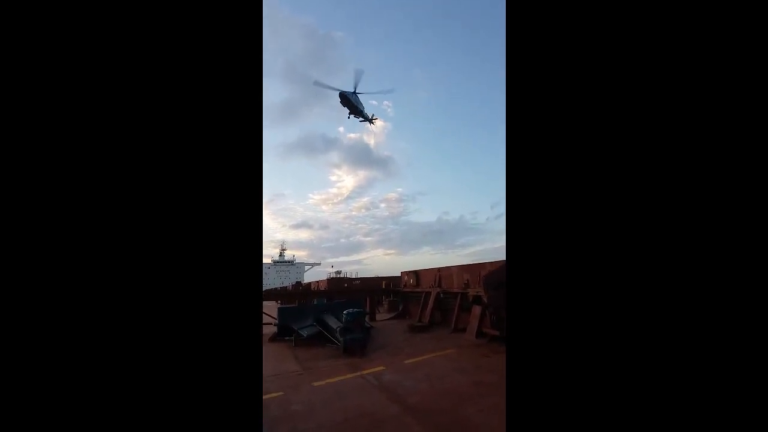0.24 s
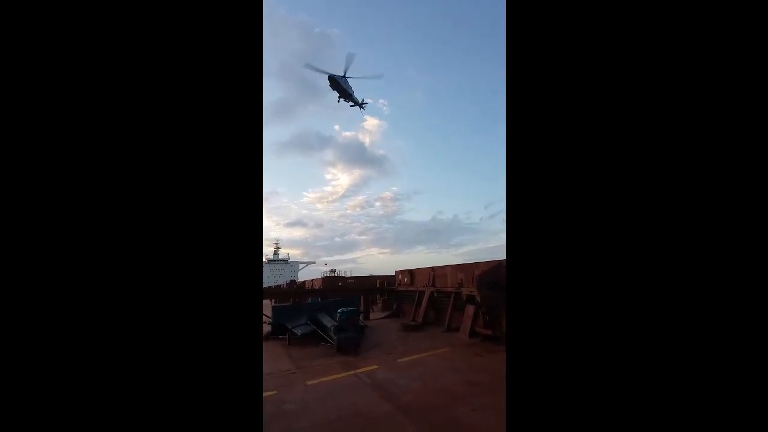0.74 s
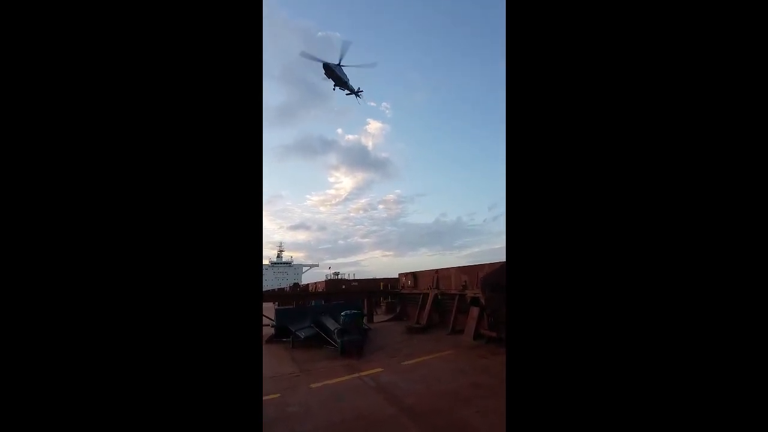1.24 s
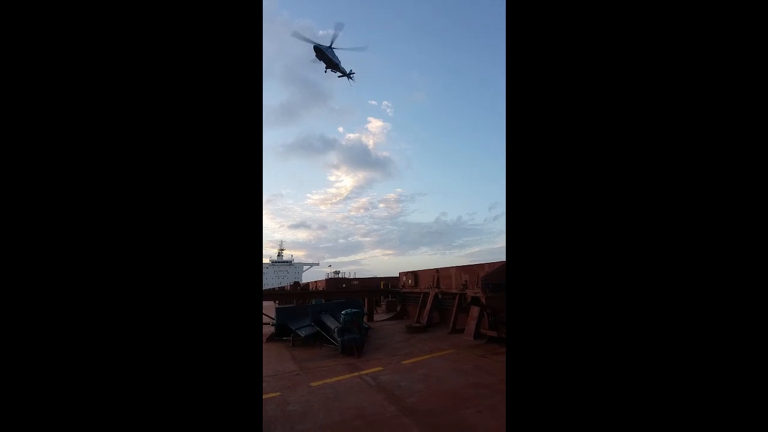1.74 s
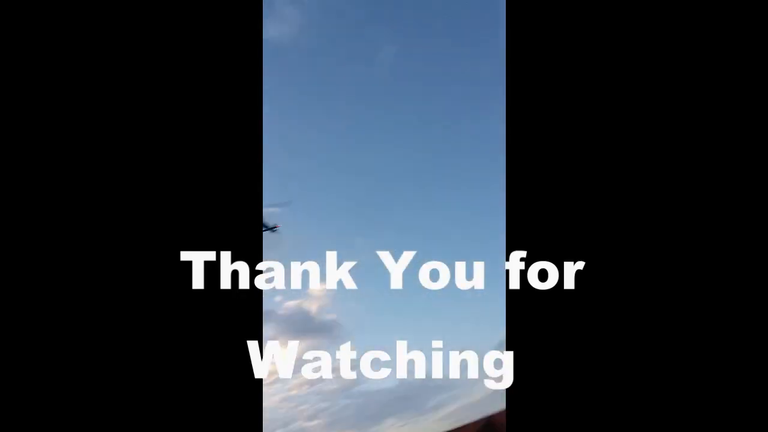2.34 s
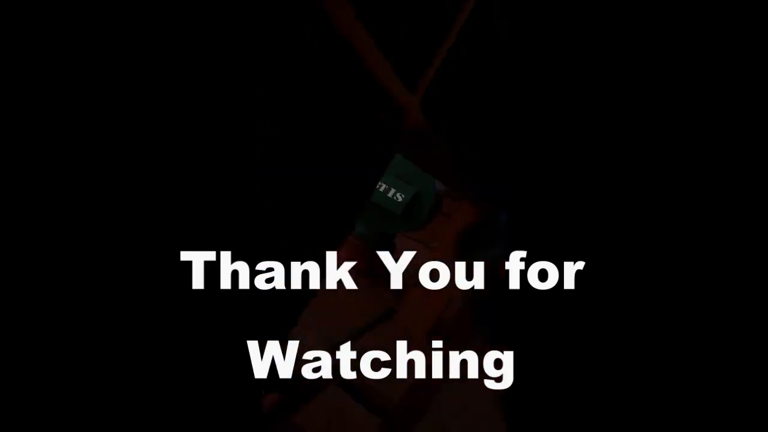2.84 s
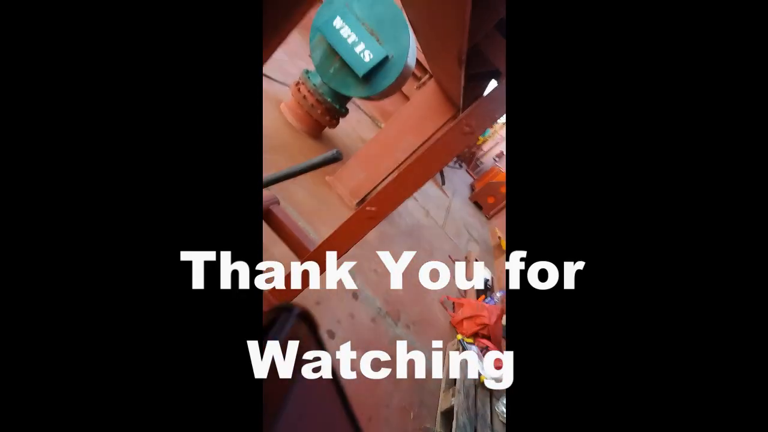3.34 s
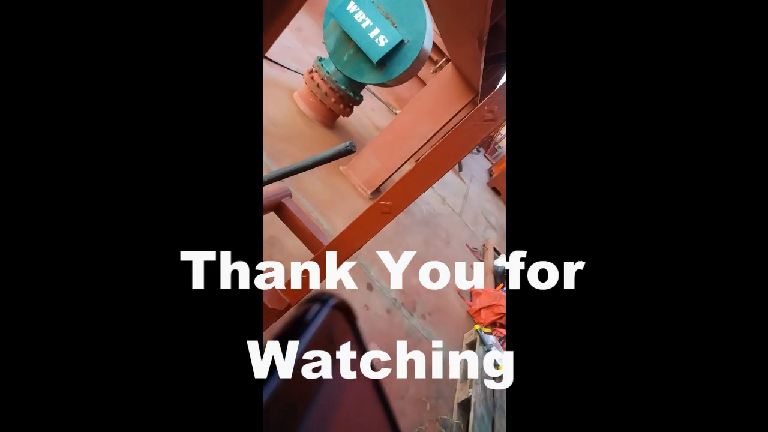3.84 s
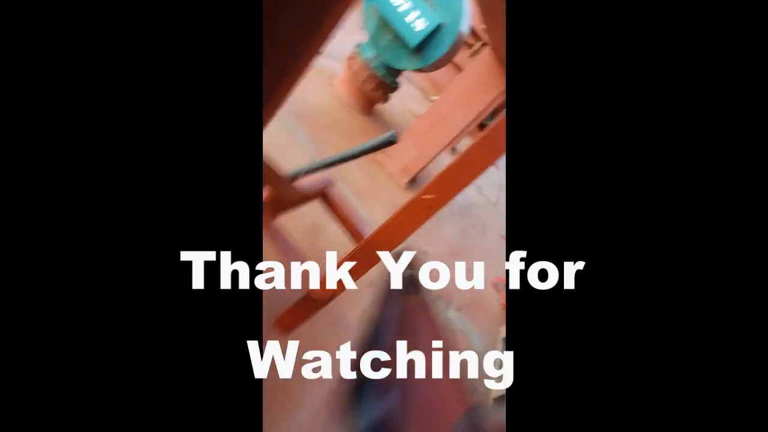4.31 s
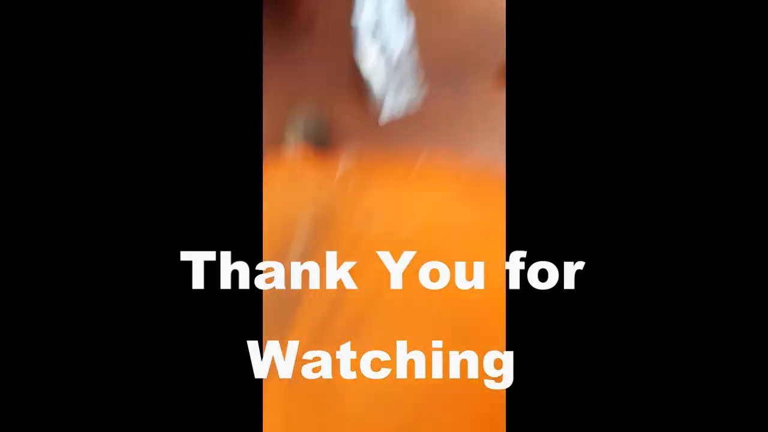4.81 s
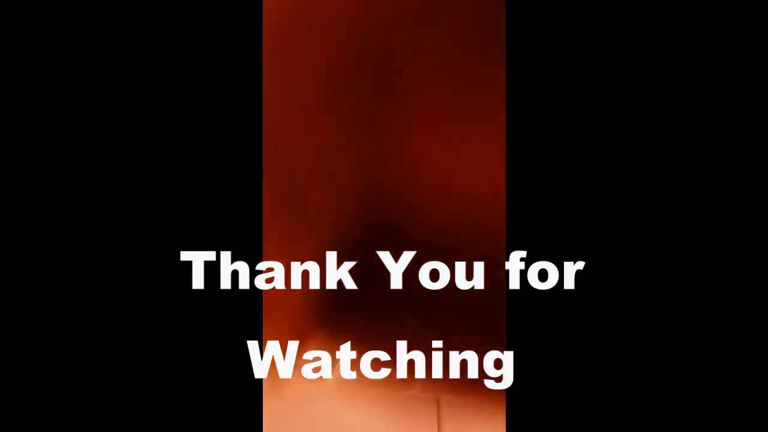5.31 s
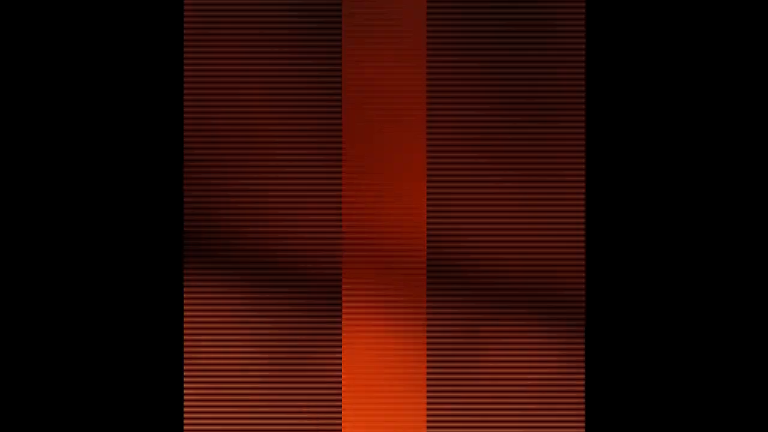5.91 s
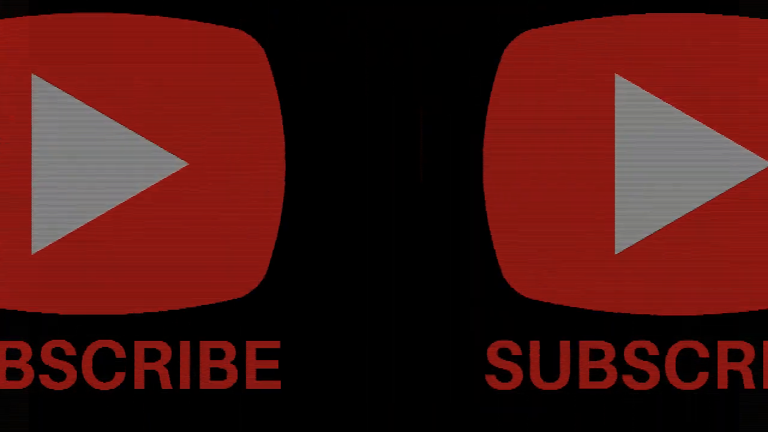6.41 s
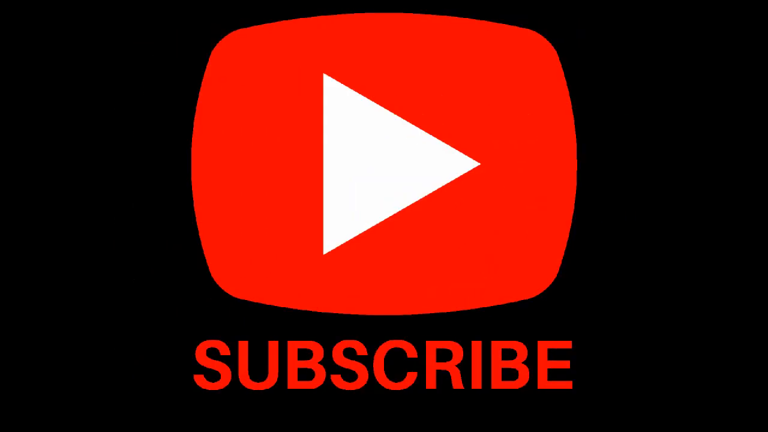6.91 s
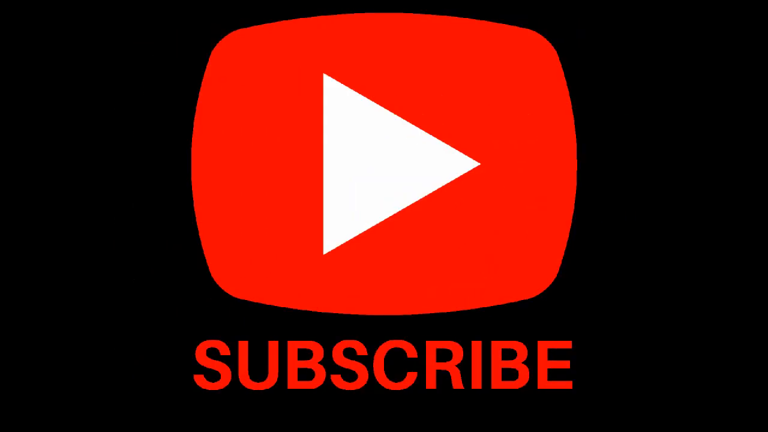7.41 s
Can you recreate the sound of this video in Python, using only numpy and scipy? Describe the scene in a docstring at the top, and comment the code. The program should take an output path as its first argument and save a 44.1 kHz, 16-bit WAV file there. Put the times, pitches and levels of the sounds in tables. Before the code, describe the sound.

Loud helicopter hovering close over a steel ship deck, buzzing tail-rotor hum, chopped roaring blades and thin turbine whine, turning duller among walls, then fading.

```python
"""On a steel ship deck, under a low hovering helicopter: its tail rotor hums, its blades roar, a turbine whines.
Blade beats are sine tones and filtered pulses; the roar is noise chopped by both rotors; the whine is fuzzy tones.
The microphone is carried from the open deck in among steel walls, where the hum swells and the roar turns dull.
Echoes, hard blade strikes, a low drone, wind and handling noise join in.
The sound is faded out, comes back at full level for a blink, and stops."""
import sys
import numpy as np
from scipy import signal
from scipy.fft import rfft, irfft, next_fast_len
from scipy.io import wavfile
from scipy.ndimage import uniform_filter1d, minimum_filter1d, map_coordinates

SR = 44100
rng = np.random.default_rng(int(sys.argv[2]) if len(sys.argv) > 2 else 0)


def materialize(psi):
    """Save the field psi as 16-bit PCM at rate SR to the path in sys.argv[1].

    A 1-D psi becomes a single channel; in a 2-D psi each row is a channel.
    """
    bounded = np.clip(np.atleast_2d(psi).T, -1, 1)
    quanta = np.round(bounded * 32767).astype(np.int16)
    wavfile.write(sys.argv[1], SR, quanta)


N = 337793  # length in samples

# speed of the tail rotor [t/s, blade passes per second]
TAIL_SPEED = [(0, 70.1), (1.2, 70.08), (1.6, 70.25), (2, 70.05), (4, 70.25), (5.5, 70.3), (6.9, 70.2)]
TAIL_START, MAIN_START = .47, .35  # rotor positions at the start, in blade passes
MAIN_PER_TAIL = .375  # main blade passes for each tail blade pass
# hum: standing waves give each low harmonic its own course, before a small shared lift
# [t/s, first level/dB, second level/dB, third level/dB]
HUM = [(0, -28.5, -29.5, -44.5), (0.5, -30, -34.5, -36.5), (0.9, -31.5, -39.5, -33),
       (1.5, -31.5, -36, -30.5), (2.1, -33.5, -30, -28.5), (2.55, -28, -21, -28),
       (2.7, -28.5, -23.5, -20.5), (2.95, -27, -38, -35), (3.4, -29.5, -33, -24), (4.05, -23, -30.5, -17),
       (4.3, -24, -29, -16), (4.62, -28, -25.5, -15), (4.84, -31.5, -25.5, -29.5), (5.02, -26.5, -24, -15),
       (5.3, -26.5, -22, -15.5), (5.5, -28, -22, -11), (5.66, -28, -30, -13.5), (5.85, -27, -27, -12),
       (6.25, -25, -27.5, -12.5), (6.6, -27.5, -35, -16.5), (6.86, -28.5, -26.5, -13)]
# the microphone's place [t/s, 0 on open deck to 1 among the walls]
SHELTER = [(0, 0.25), (2.3, 0.053), (2.5, 0.95), (3.4, 0.72), (4.4, 0.89), (4.9, 0.97), (5.3, 0.95),
           (6.9, 0.97)]

# colours of the noise layers on open deck and among the walls; only the shape counts [f/Hz, level/dB]
RUMBLE_OPEN = [(20, -28), (40, -29), (60, -21), (100, -24.5), (150, -1), (190, 4.5), (240, -3.5),
               (320, -1.5), (380, 4.5), (440, -0.5), (600, -50.5)]
RUMBLE_WALLS = [(20, -33), (35, -35.5), (50, -33.5), (100, -18.5), (150, -13), (190, -0.5), (240, 1.5),
                (300, -1.5), (380, -4.5), (440, -7.5), (600, -50.5)]
ROAR_OPEN = [(280, -39.5), (400, -26), (490, -5.5), (580, 0.5), (680, -1.5), (780, -4), (880, -4.5),
             (980, -2.5), (1100, -8.5), (1500, -44.5)]
ROAR_WALLS = [(280, -40), (400, -1.5), (460, 2.5), (530, 4), (650, 2.5), (770, 2.5), (880, 0), (980, -5),
              (1100, -3), (1500, -49.5)]
RASP_OPEN = [(800, -29.5), (1050, -3), (1250, 2), (1550, -2), (1850, -5.5), (2250, -12), (3000, -41.5)]
RASP_WALLS = [(800, -27.5), (1100, -1), (1280, 1), (1550, 0.5), (1850, -1), (2250, -9.5), (3000, -42)]
HISS_OPEN = [(1700, -24.5), (2300, -3), (2900, 1.5), (3600, -5), (4400, -4), (5600, -11.5), (6500, -6.5),
             (7200, -13.5), (8000, -21.5), (10000, -15.5), (12500, -18), (15500, -32)]
HISS_WALLS = [(1700, -18.5), (2300, 3), (2900, 0), (3500, -2.5), (4100, -3.5), (5600, -9), (6900, -10),
              (8100, -19.5), (10000, -17.5), (12500, -21.5), (14000, -26), (15500, -40.5)]
# colour of one tail blade's pulse in both places; only the shape counts [f/Hz, level/dB]
THUMP_OPEN = [(150, -42), (215, -25.5), (280, -13), (350, -30.5), (420, -5), (490, 2.5), (560, 1.5),
              (630, -8), (700, -6), (770, 4), (850, -4.5), (1000, -15.5), (1500, -30.5), (3000, -41)]
THUMP_WALLS = [(150, -37), (215, -20), (280, 1.5), (350, 8.5), (420, -2), (490, 2), (560, 2.5), (680, -7.5),
               (770, 4), (880, -12), (1250, -23.5), (1800, -27), (3000, -38)]
# colours of slaps, cracks and gusts; only the shape counts [f/Hz, level/dB]
SLAP = [(300, -24), (700, 1.5), (1050, 7), (2000, 8), (3000, 2.5), (4500, -6.5), (5500, -18.5), (8000, -40)]
CRACK = [(700, -12), (1500, 0), (3000, 0), (4500, -1), (5500, -12), (8000, -25)]
GUST = [(250, -20.5), (550, 1), (900, 1), (1700, -0.5), (2500, -13), (4500, -17), (8000, -37.5)]

# the load on the blades drives roar, rumble and thumps [t/s, level/dB]
ROAR_LEVEL = [(0, -18.5), (0.33, -15.5), (0.43, -20), (0.6, -18.5), (0.9, -15.5), (1.9, -18), (2.21, -16),
              (2.3, -14.5), (2.345, -12), (2.47, -16), (2.8, -18), (3, -15.5), (3.75, -16.5), (3.95, -15),
              (4.4, -14.5), (5.05, -14.5), (5.25, -16.5), (6.1, -17.5), (6.36, -19.5), (6.62, -16.5),
              (6.86, -17.5)]
# the rasp of the blade tips [t/s, level/dB]
RASP_LEVEL = [(0.0, -24), (0.12, -23), (0.54, -22.5), (0.72, -19), (0.81, -21), (0.99, -20.5), (1.14, -22),
              (1.89, -26), (2.19, -21), (2.4, -29.5), (2.49, -20.5), (3.3, -27), (3.6, -22.5),
              (3.81, -25.5), (4.05, -22.5), (4.35, -24.0), (4.5, -20.5), (4.77, -20.5), (5.07, -17.5),
              (5.28, -22.5), (5.97, -23.5), (6.09, -25.5), (6.35, -22.5), (6.44, -20.5), (6.63, -22.5),
              (6.86, -24.5)]
# the hiss rises and falls as the microphone turns [t/s, level/dB]
HISS_LEVEL = [(0, -26), (0.9, -26), (1.1, -29), (1.5, -29), (1.9, -31.5), (2.15, -29), (2.29, -29),
              (2.35, -35), (2.55, -31.5), (3.5, -37), (4.3, -35), (4.6, -32.5), (4.84, -27), (5.02, -25.5),
              (5.18, -29), (5.3, -30), (6.15, -33.5), (6.55, -33.5), (6.86, -29.5)]
# the turbine swells and sinks on its own [t/s, level/dB]
WHINE_LEVEL = [(0.0, -30.5), (0.15, -38), (0.36, -31.5), (0.66, -33.5), (0.93, -31.5), (1.41, -43.5),
               (2.16, -38.5), (2.22, -34.5), (2.31, -48.5), (2.46, -38), (2.67, -45.5), (2.76, -41),
               (3.45, -47), (4.65, -43), (4.83, -32), (4.92, -39), (5.1, -33.5), (5.31, -40), (5.7, -39.5),
               (5.76, -44.5), (5.88, -38.5), (6.63, -49.5), (6.86, -39.5)]
# offsets added to those levels (dB on open deck, dB among the walls)
RUMBLE_DB, ROAR_DB, THUMP_DB = (-13, -2.5), (-4, -1), (-3, -4.5)
RASP_DB, HISS_DB, WHINE_DB = (-1.5, 0), (-2.5, 0.5), (0.5, 0)
# middle pitch of the whine [t/s, f/Hz]
WHINE_PITCH = [(0, 13150), (.7, 13250), (1.3, 13310), (1.9, 13370), (2.4, 13280), (3.8, 13220), (5, 13270),
               (6.9, 13260)]
CHIRP_DB = -4  # chirps against the whine's core
# the tail blades chop hardest in short spells [t/s, depth of the chop]
CHOP_DEPTH = [(0.38, 2.7), (0.55, 1.5), (0.85, 2.1), (1.5, 1.6), (1.9, 2.7), (2.13, 2.7), (2.25, 1.7)]
# standing waves lift and sink single overtones of the thumps
# {multiple of the blade rate: [t/s, level/dB]}
OVERTONE_LIFT = { 4: [(0.3, 8.5), (1, -6), (2.8, 0.5), (3.8, 6), (4.9, 0.5), (6, -10)], 5: [(0.4, -3.5),
                 (1.2, 9.5), (2.2, -5.5), (2.6, 4.5), (3, -5.5), (3.7, -5), (4.4, 1), (5.4, -1),
                 (6.2, -1.5), (6.5, -5.5)], 6: [(0.5, -3), (1.6, 7.5), (2.3, -2.5), (3.5, 1), (4.4, 11.5),
                 (5.5, -2)], 7: [(0.1, 0), (1.1, 2.5), (1.8, 0), (2.8, -11), (4, 0), (5.2, -3.5),
                 (5.9, 2.5), (6.3, 7), (6.6, 6), (6.86, -1.5)], 8: [(0.2, 3.5), (0.6, -1), (1.5, -3),
                 (2.3, 5), (2.7, -3), (3.6, -5.5), (4.7, 3.5), (5.4, -11)], 9: [(0.3, 9), (1, -3.5),
                 (2.2, 3.5), (3, -2.5), (4, -7.5), (5.5, -3)], 10: [(0.6, -5), (1.4, 5), (2.2, 1),
                 (3.2, -3.5), (4.4, -2), (5.6, 3)], 11: [(0.6, 1), (1.3, -7.5), (2.2, -0.5), (2.9, -4),
                 (4.6, -2), (5.6, 1.5), (6.3, -6)]}
OVERTONE_WAVER_DB, OVERTONE_WAVER_RATE = 1, 6.7  # size, random points a second

# a band of the roar shines or is shaded [t/s, centre f/Hz, level/dB]
ROAR_SHEEN = [(0.3, 390, -6), (1.1, 420, 3.5), (2.3, 460, -1.5), (2.9, 580, 1.5), (4.2, 540, 3.5),
              (5, 560, -1.5), (5.6, 556, -1.5), (6.5, 550, -1.5)]
# a bright band in the rasp slides as the steel faces shift around the microphone
# [t/s, centre f/Hz, level/dB]
RASP_SHEEN = [(0.3, 1950, 1), (0.8, 1510, -1), (1.4, 1350, 4.5), (2, 1070, 2.5), (2.8, 1020, 4),
              (3.3, 1510, -0.5), (3.9, 1440, 6.5), (4.4, 1250, 4.5), (5, 1130, 2.5), (5.8, 1250, 2),
              (6.5, 1230, 1.5)]
# as the microphone turns, a band of the hiss shines or is shaded [t/s, centre f/Hz, level/dB]
HISS_SHEEN = [(0.4, 3200, 0), (1.4, 2900, 2), (1.7, 4393, 0.5), (2.26, 4200, 7), (2.4, 3400, 4),
              (2.55, 4800, 2), (2.9, 4800, 3), (3.7, 4400, -2.5), (4.5, 4300, -2), (4.8, 4500, -0.5),
              (5.5, 4210, 3), (5.8, 5240, 4.5), (6.3, 5500, 0.5)]
ROAR_SHEEN_WIDTH_HZ, RASP_SHEEN_WIDTH_HZ, HISS_SHEEN_WIDTH_HZ = 60, 156, 550

# a spell in which every tail blade cuts a vortex and slaps
SLAP_PEAK_S, SLAP_SPREAD_S, SLAP_DB, SLAP_RISE_S = 2.075, 0.095, -11.5, .0007
SLAP_LAG = .19  # share of a blade pass by which the slap is late
# the hardest single blade strikes [t/s, knock level/dB, crack level/dB]
STRIKES = [(0.267, -14, -25), (0.295, -11, -30), (0.466, -26, -22), (0.666, -4, -31), (0.809, -6, -28),
           (0.853, -6, -37), (1.067, -18, -32), (1.111, -10, -26), (1.167, -11, -33), (1.239, -4, -34),
           (1.528, -20, -31), (2.078, -12, -25), (2.092, -17, -16), (2.21, -5, -30), (2.221, 1, -30),
           (2.323, -3, -36), (2.352, 0, -36), (2.363, -7, -36), (4.754, -14.5, -23), (4.796, -20, -23),
           (4.836, -14, -21), (4.868, -20, -25), (4.894, -20, -19), (4.935, -22, -20)]
KNOCK_HZ, KNOCK_HALF_S, CRACK_HALF_S = 700, .0018, .0013

# the deck's echo comes sooner once the microphone sinks towards it [t/s, lag/ms]
DECK_LAG = [(0, 10.9), (.9, 10.35), (1.8, 10.25), (3, 9.0), (4, 8.15), (4.6, 8.0), (5.3, 6.25), (6, 6.15),
            (6.9, 5.7)]
WALL_LAG_MS = 3.95
DECK_ECHO, WALL_ECHO = (0.28, 0.48), (0.036, 0.17)  # share of the direct sound (open deck, walls)
# the nearest steel face [t/s, lag of its echo/ms, share of the direct sound]
FACE = [(0, 1.86, 0.02), (1, 2.06, 0.23), (1.7, 2.15, 0.02), (2.1, 1.1, 0.15), (2.36, 1.39, 0.22),
        (3.2, 1.8, 0.23), (4.1, 1.4, 0.18), (5.6, 2, 0), (6.15, 1.97, 0.18)]
# a low drone between the steel walls [t/s, level/dB]
DRONE_LEVEL = [(3.5, -64), (4, -35), (4.5, -39), (4.9, -59.5), (5.5, -33), (6.9, -45)]

# wind brushes the microphone as it swings down [t/s, half length/s, level/dB]
PUFFS = [(2.54, .07, -23.5), (2.67, 0.044, -29)]
# gusts of downwash rush past [t/s, half length/s, level/dB]
GUSTS = [(2.96, .035, -26), (3.125, 0.018, -22.5), (4.98, 0.034, -25.5), (5.06, 0.033, -19)]
# faint rustles of handling [t/s, half length/s, level/dB]
RUSTLES = [(4.84, .008, -28), (4.878, .012, -27), (5.015, .006, -25), (5.225, .01, -24.5),
           (5.547, .008, -25.5)]
GRIT_DB, GRIT_RATE = 4, 500  # crackle of gusts and rustles: size, random points a second

# how alike left and right are in the noise layers [f/Hz, likeness 0-1]
ALIKE = [(25, .5), (55, .7), (100, .995), (160, .9999), (300, .9999), (780, .9999), (1100, .998),
         (2000, .993), (4000, .982), (6500, .94), (8000, .92), (11000, .93), (14000, .96)]
# boost of the right port and equal cut of the left one [f/Hz, level/dB]
PORT_TILT = [(800, 0), (1400, .33), (4500, .35), (8000, .1)]
# fade, blink of full level and stop [t/s, gain]
FADER = [(0, 1), (5.9, 1), (6.822, .012), (6.824, 1), (6.890, 1), (6.891, 0), (7.7, 0)]
TOP_HZ = 15750  # nothing is kept from here up


def tail_hum(passes):
    """The hum is the three lowest harmonics of the tail rotor's blade passes, each wavering a little."""
    hum = 0
    for k, level_db in enumerate(curves(HUM), 1):
        phase = 2 * np.pi * (k * passes + rng.random()) + 0.05 * wobble(6.2)
        hum = hum + amp(level_db + 1.06 + 0.73 * wobble(17)) * np.sqrt(2) * np.sin(phase)
    return hum


def tail_thumps(passes, strength, shelter):
    """Each tail blade sends out one pressure pulse, its timing shaken by turbulent air."""
    jitter = 0.0074 * wobble(25)
    pulses = np.diff(np.floor(passes + jitter), prepend=0).clip(0) * strength
    open_deck = unit(causal(pulses, THUMP_OPEN))
    walls = unit(causal(pulses, THUMP_WALLS))
    thumps = standing_waves((1 - shelter) * open_deck + shelter * walls, passes)
    # each pulse is spread over a few milliseconds, its low tones trailing
    spread = filtered(thumps, lambda hz: np.exp(-1j * 12 * np.log1p(hz / 500)))
    return amp(level(ROAR_LEVEL, THUMP_DB, shelter)) * spread


def standing_waves(thumps, passes):
    """Standing waves make single overtones of the thumps swell, sink and waver."""
    blade_hz = passes[-1] * SR / N  # close to the average blade rate
    result = thumps
    for k, rows in OVERTONE_LIFT.items():
        overtone = filtered(thumps, lambda hz: np.exp(-(2 * (hz / blade_hz - k)) ** 4))
        lift = amp(curves(rows)[0] + OVERTONE_WAVER_DB * wobble(OVERTONE_WAVER_RATE))
        result = result + (lift - 1) * overtone
    return result


def blade_wash(tail, strength, main, shelter):
    """Turbulent air in the wake of the blades makes noise, which both rotors chop."""
    gust = wobble(22)

    def layer(driver, offsets_db, flutter_db, noise):
        """Noise at its driven level, with a flutter partly shared by all layers."""
        flutter = .5 * gust + .5 * wobble(17)
        return amp(level(driver, offsets_db, shelter) + flutter_db * flutter) * noise

    rumble = layer(ROAR_LEVEL, RUMBLE_DB, 0.34, carried(RUMBLE_OPEN, RUMBLE_WALLS, shelter))
    roar = layer(ROAR_LEVEL, ROAR_DB, 1.2, carried(ROAR_OPEN, ROAR_WALLS, shelter))
    rasp_noise = sheen(carried(RASP_OPEN, RASP_WALLS, shelter), RASP_SHEEN, RASP_SHEEN_WIDTH_HZ)
    rasp = layer(RASP_LEVEL, RASP_DB, 2.17, rasp_noise)
    hiss_noise = sheen(carried(HISS_OPEN, HISS_WALLS, shelter), HISS_SHEEN, HISS_SHEEN_WIDTH_HZ)
    hiss = layer(HISS_LEVEL, HISS_DB, 1.6, hiss_noise)

    body = patchy(sheen(rumble + roar, ROAR_SHEEN, ROAR_SHEEN_WIDTH_HZ) + rasp, depth_db=1.5)
    # the walls' many reflections fill the gaps between the bursts
    body_chop = chop(tail, strength * (1 - .82 * shelter), depth=curves(CHOP_DEPTH)[0], fall=.19)
    hiss_chop = chop(tail, strength * (1 - .78 * shelter), depth=1.0, fall=.13)
    main_chop = chop(main, per_blade(main, scatter_db=3), depth=.18, fall=.25)
    return (body * body_chop + hiss * hiss_chop) * main_chop


def blade_slaps(passes):
    """In a short spell each tail blade cuts a vortex: a sharp burst of broad noise that dies away."""
    spell = np.exp(-((np.arange(N) / SR - SLAP_PEAK_S) / SLAP_SPREAD_S) ** 2)
    late = passes - SLAP_LAG
    age = late % 1 / curves(TAIL_SPEED)[0] / SLAP_RISE_S  # 1 at the peak of a burst
    bursts = per_blade(late, scatter_db=.7) * age * np.exp(1 - age)
    return amp(SLAP_DB) * spell * bursts * rush(SLAP)


def hard_strikes():
    """A blade that hits a vortex squarely gives a short hollow knock with a crack on top."""
    knocks, cracks = np.zeros(N), np.zeros(N)
    t = np.arange(-SR // 100, SR // 100) / SR
    knock = np.exp(-(t / KNOCK_HALF_S) ** 2) * np.cos(2 * np.pi * KNOCK_HZ * t)
    crack = np.exp(-(t / CRACK_HALF_S) ** 2)
    for s, knock_db, crack_db in STRIKES:
        start = round(s * SR) - len(t) // 2
        knocks[start:][:len(t)] += amp(knock_db) * knock
        cracks[start:][:len(t)] += amp(crack_db) * crack
    return knocks + cracks * rush(CRACK)


def turbine(main, shelter):
    """A fuzzy whine on a skirt of hiss; each main blade scatters it into a short falling chirp."""
    pitch_hz = curves(WHINE_PITCH)[0]
    level_db = level(WHINE_LEVEL, WHINE_DB, shelter)
    core = unit(whistle(pitch_hz, width_hz=65) * amp(2.5 * wobble(45)))
    skirt = unit(whistle(pitch_hz + 100, width_hz=760))
    sweep = main % 1  # 0 to 1 over one main blade pass
    glide = whistle(pitch_hz + 1500 * (1 - sweep) ** 1.4, width_hz=70)
    swell = np.sin(np.pi * sweep ** 1.4) ** 3
    chirps = unit(per_blade(main, scatter_db=4.5) * swell * glide)
    whine = unit(core + amp(-1.0) * skirt + amp(CHIRP_DB) * chirps)
    # a little of the whine reaches the two ports in opposite phase
    side = amp(-20) * whistle(pitch_hz, width_hz=200) * [[1], [-1]]
    return amp(level_db + 0.91 * wobble(23)) * (whine + side)


def whistle(pitch_hz, width_hz):
    """A tone made fuzzy: slow random noise shakes its size and phase."""
    def fuzz():
        return unit(filtered(rng.standard_normal(N), lambda hz: 1 / (1 + (hz / width_hz) ** 2)))

    phase = 2 * np.pi * np.cumsum(pitch_hz) / SR
    return fuzz() * np.cos(phase) + fuzz() * np.sin(phase)


def deck_drone():
    """A low wavering drone with a weak octave stands between the steel walls."""
    level_db = curves(DRONE_LEVEL)[0]
    phase = 2 * np.pi * np.cumsum(46.8 + 0.5 * wobble(5)) / SR
    tones = np.sin(phase) + amp(-7.5) * np.sin(2 * phase)
    return np.sqrt(2) * amp(level_db + 1.49 * wobble(5.4)) * tones


def reflected(x, shelter):
    """Echoes off deck, nearest steel face and a wall comb the sound; moving the microphone slides the combs."""
    near_ms, near = curves(FACE)
    deck = np.interp(shelter, [0, 1], DECK_ECHO)
    wall = np.interp(shelter, [0, 1], WALL_ECHO)
    copies = deck * echo(x, curves(DECK_LAG)[0]) + wall * echo(x, WALL_LAG_MS)
    # sound bounces twice off the nearest face, so it honks when the face is close
    copies = copies + near * echo(x, near_ms) + near ** 2 * echo(x, 2 * near_ms)
    # clutter on the steel scatters the treble away
    dull = filtered(copies, lambda hz: 1 / (1 + (hz / 2200) ** 2))
    return (x + dull) / np.sqrt(1 + deck ** 2 + wall ** 2 + 2 * near ** 2)


def handling():
    """Puffs of wind, gusts and small rustles at the moving microphone are short swells of noise."""
    t = np.arange(N) / SR

    def swells(rows):
        return sum(amp(db) * np.exp(-((t - s) / half) ** 2) for s, half, db in rows)

    wind = swells(PUFFS) * rush([(20, -25), (50, -14.5), (100, -1.5), (160, 6), (300, -25)])
    rustle = swells(RUSTLES) * rush([(1500, -15), (2500, -2.5), (4200, 0.5), (5500, -9), (9000, -30)])
    grit = unit(amp(GRIT_DB * wobble(GRIT_RATE)))
    return wind + grit * (swells(GUSTS) * rush(GUST) + rustle)


def amp(db):
    """Decibels to gain."""
    return 10 ** (np.asarray(db) / 20)


def unit(x):
    """Scale to an average (rms) strength of 1."""
    return x / np.sqrt(np.mean(x ** 2) + 1e-20)


def along(points, hz):
    """Read (f/Hz, value) points on a log frequency axis."""
    f, v = np.transpose(points)
    return np.interp(np.log(hz + 1), np.log(f + 1), v)


def curves(rows):
    """One value per sample for each column after the time."""
    s, *cols = np.transpose(rows)
    return [np.interp(np.arange(N) / SR, s, c) for c in cols]


def level(driver, offsets_db, shelter):
    """A layer's level in dB: its driving level plus an offset that slides from open deck to walls."""
    open_db, walls_db = offsets_db
    return curves(driver)[0] + open_db + (walls_db - open_db) * shelter


def wobble(rate):
    """A smooth random curve through `rate` random points a second."""
    knots = np.arange(0, N * rate / SR + 1, 1 / 8)
    smooth = map_coordinates(rng.standard_normal(int(knots[-1]) + 4), [knots])
    return np.interp(np.arange(N) * rate / SR, knots, smooth)


def per_blade(passes, scatter_db):
    """A random, bounded strength for each passing blade, from a store of 1024."""
    strengths = amp(scatter_db * rng.uniform(-1.7, 1.7, 1024))
    return strengths[passes.astype(int) % 1024]


def chop(passes, strength, depth, fall):
    """Gain of rms 1: every passing blade throws a burst that swells fast and dies within the cycle."""
    cycle = passes % 1
    age = cycle / fall  # 1 near the peak of the burst
    return unit(1 + depth * strength * age * np.exp(1 - age) * (1 - cycle))


def filtered(x, response):
    """Multiply the spectrum of x by a response that depends on frequency."""
    m = next_fast_len(N + 8192)
    return irfft(rfft(x, m) * response(np.fft.rfftfreq(m, 1 / SR)), m)[..., :N]


def causal(x, spectrum):
    """Filter x to the given (f/Hz, dB) shape with minimum phase: nothing sounds ahead of its pulse."""
    size = 4096
    cepstrum = irfft(np.log(colour(spectrum, np.fft.rfftfreq(size, 1 / SR))))
    fold = np.r_[1, np.full(size // 2 - 1, 2), np.zeros(size // 2)]
    pulse = irfft(np.exp(rfft(cepstrum * fold)))
    return signal.fftconvolve(x, pulse)[:N]


def colour(spectrum, hz):
    """Gain of (f/Hz, dB) points, falling steeply far above the last one."""
    return amp(along(spectrum, hz)) / (1 + (hz / (2 * spectrum[-1][0])) ** 4)


def rush(spectrum):
    """Nearly mono coloured noise of rms 1: a shared part plus a small left-right difference."""
    m = next_fast_len(N)
    hz = np.fft.rfftfreq(m, 1 / SR)
    alike = along(ALIKE, hz)
    white = rng.standard_normal((2, len(hz))) + 1j * rng.standard_normal((2, len(hz)))
    shares = np.sqrt([1 + alike, 1 - alike])
    mid, side = irfft(white * colour(spectrum, hz) * shares, m)[:, :N]
    return unit(np.array([mid + side, mid - side]))


def carried(open_deck, walls, shelter):
    """Noise whose colour changes as the microphone moves in among the walls."""
    return np.sqrt(1 - shelter) * rush(open_deck) + np.sqrt(shelter) * rush(walls)


def echo(x, lag_ms):
    """Delay both channels by a steady or moving lag."""
    n = np.arange(N)
    return np.array([np.interp(n - lag_ms * SR / 1000, n, side) for side in x])


def patchy(x, depth_db):
    """Many drifting reflections lift and sink patches of the spectrum."""
    z = signal.stft(x, nperseg=2048)[2]
    field = uniform_filter1d(rng.standard_normal(z.shape[1:]), size=2, axis=0)  # over frequency
    field = uniform_filter1d(field, size=16, axis=1)  # over time
    gain = unit(amp(depth_db * unit(field)))
    return signal.istft(z * gain, nperseg=2048)[1][:, :N]


def sheen(x, rows, width_hz):
    """A broad sliding peak or dip in the spectrum, from (t/s, centre f/Hz, level/dB) rows."""
    hz, t, z = signal.stft(x, SR, nperseg=512)
    s, centres, lifts = np.transpose(rows)
    bell = np.exp(-((hz[:, None] - np.interp(t, s, centres)) / width_hz) ** 2)
    gain = amp(bell * np.interp(t, s, lifts))
    return signal.istft(z * gain, nperseg=512)[1][:, :N]


def scene():
    """Both rotors turn on one gearbox, so their blade passes keep a fixed ratio; all sources add up."""
    tail = TAIL_START + np.cumsum(curves(TAIL_SPEED)[0]) / SR
    main = MAIN_START + tail * MAIN_PER_TAIL
    shelter = np.clip(curves(SHELTER)[0], 0, 1)
    strength = per_blade(tail, scatter_db=0.14)
    rotors = tail_thumps(tail, strength, shelter) + blade_wash(tail, strength, main, shelter)
    rotors = reflected(rotors + blade_slaps(tail), shelter)
    tones = tail_hum(tail) + turbine(main, shelter) + deck_drone()
    return rotors + hard_strikes() + tones + handling()


def record(dry):
    """The microphone drops the deepest bass, a limiter holds the peaks, then fader and band limit follow."""
    def port_response(hz):
        tilt = amp(along(PORT_TILT, hz) * [[-1], [1]])
        return tilt * hz ** 4 / (hz ** 4 + 27 ** 4)

    ports = filtered(dry, port_response)
    needed = 1 / np.maximum(np.abs(ports).max(axis=0) / .94, 1)
    # the limiter turns down a little ahead of each peak and eases back after it
    gain = uniform_filter1d(minimum_filter1d(needed, size=221), size=221)
    return filtered(ports * gain * curves(FADER)[0], lambda hz: hz < TOP_HZ)


dry = scene()
out = record(dry)
materialize(out)
```